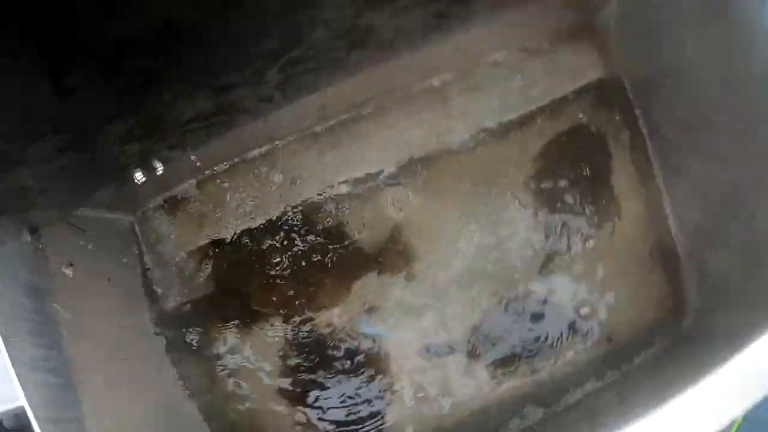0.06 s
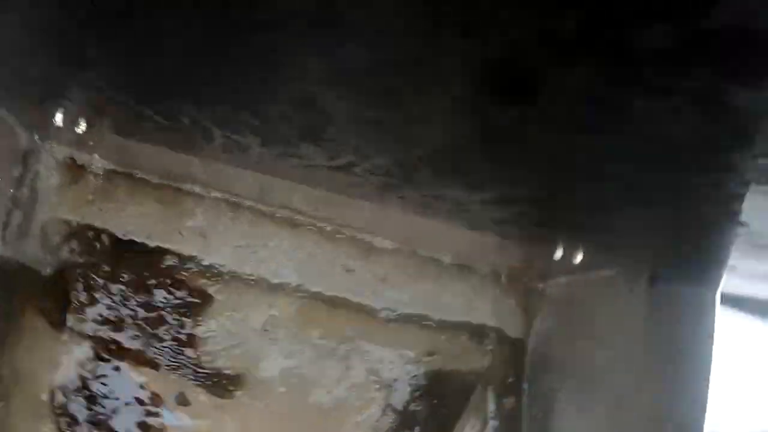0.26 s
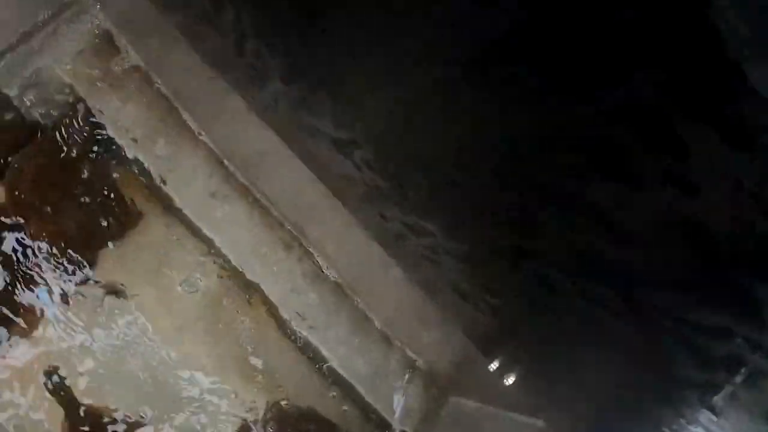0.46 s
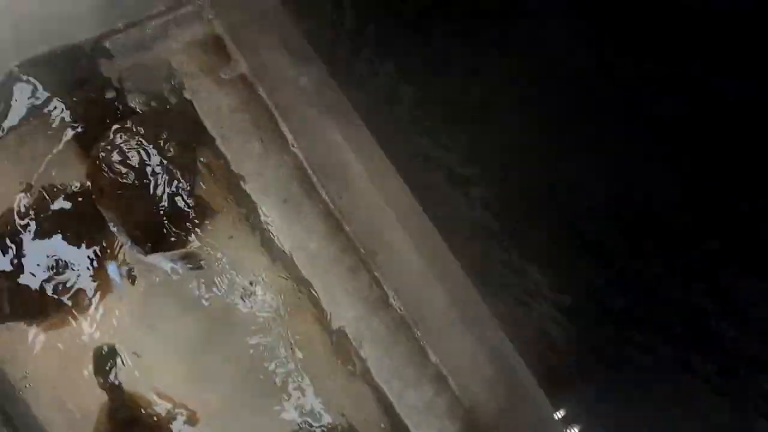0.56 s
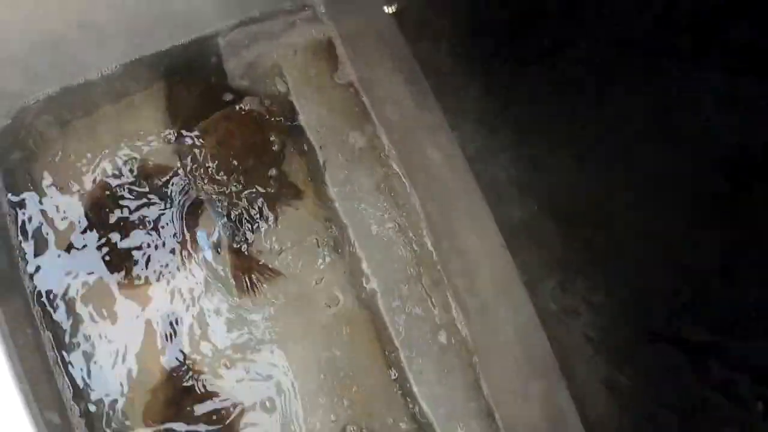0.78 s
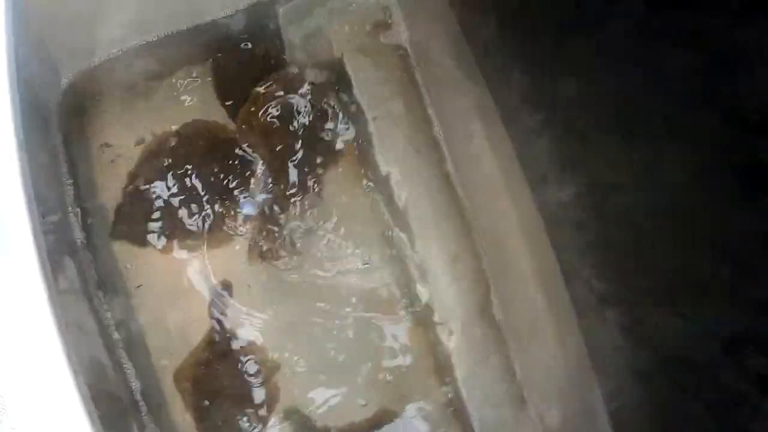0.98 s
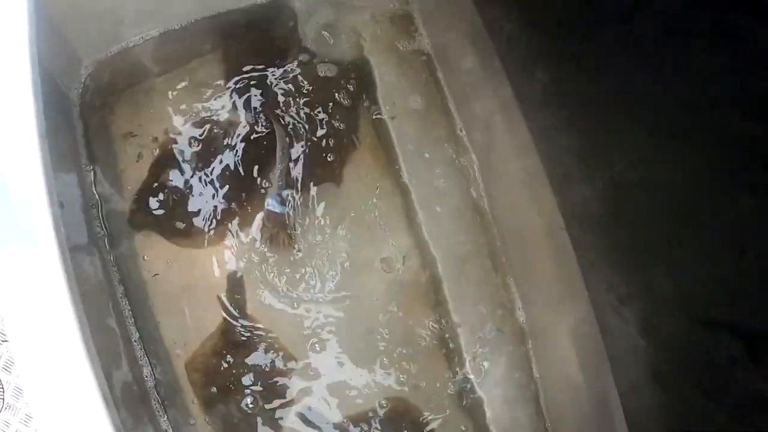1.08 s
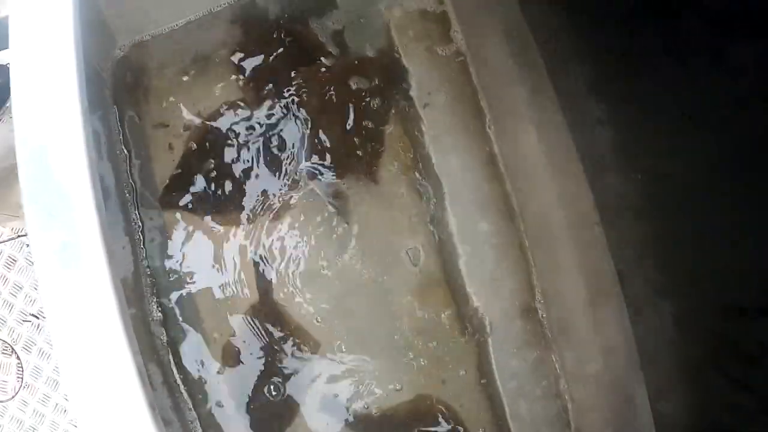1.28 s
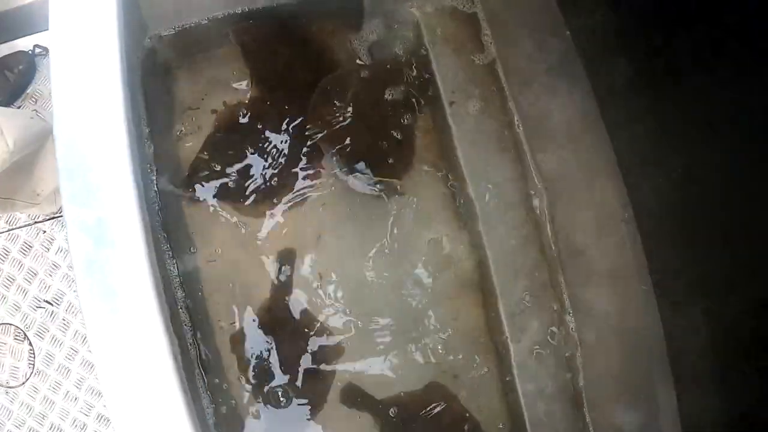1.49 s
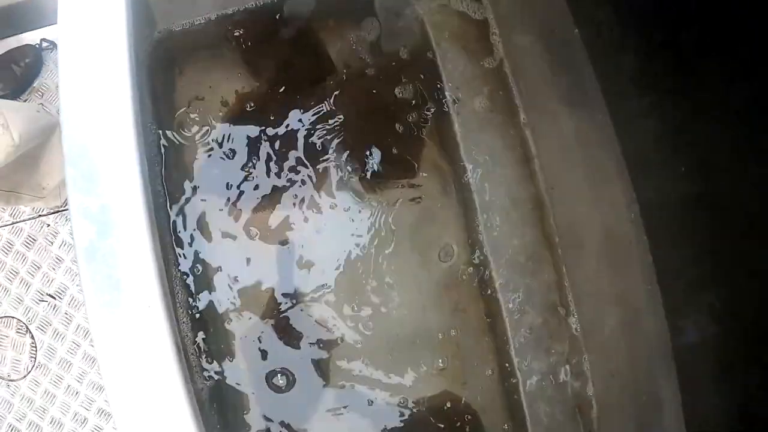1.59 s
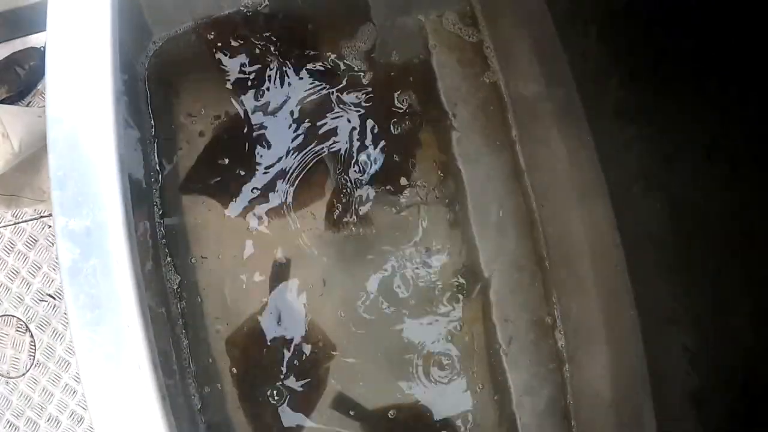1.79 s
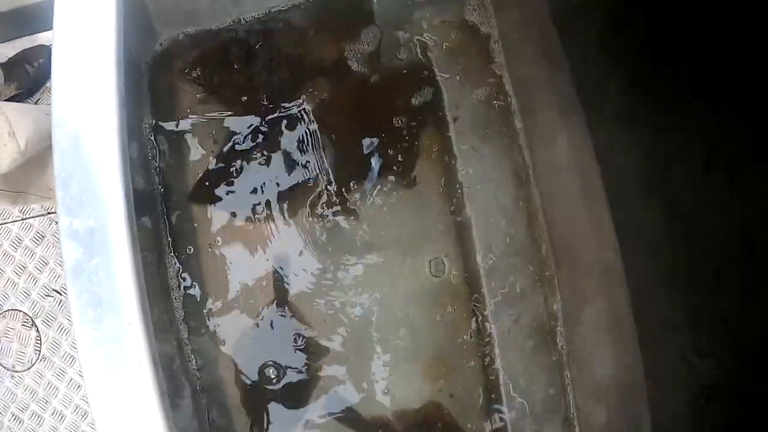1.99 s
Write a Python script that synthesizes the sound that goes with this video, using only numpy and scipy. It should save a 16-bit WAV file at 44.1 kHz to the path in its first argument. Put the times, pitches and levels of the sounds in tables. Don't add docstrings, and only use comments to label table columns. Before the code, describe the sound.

A flatfish thrashes in a shallow water tank, three booming splashes, then drips and bubbles

```python
import sys
import numpy as np
from scipy import signal
from scipy.fft import rfft, irfft
from scipy.io import wavfile
from scipy.ndimage import uniform_filter1d

SR = 44100
rng = np.random.default_rng(int(sys.argv[2]) if len(sys.argv) > 2 else 0)


def invert_db(x):
    u = np.asarray(x, float) / 20
    return 10 ** u


def wav_out(sig):
    wavfile.write(sys.argv[1], SR, np.round(np.clip(np.atleast_2d(sig).T, -1, 1) * 32767).astype(np.int16))


N = 90404


def rms_one(x):
    return x / np.sqrt(np.mean(x ** 2) + 1e-20)


def in_time(rows):
    return np.interp(np.arange(N) / SR, *np.transpose(rows))


def at_hz(points, hz):
    points_hz, points_db = np.transpose(points)
    return np.interp(np.log(hz), np.log(points_hz), points_db)


def colour(x, points):
    hz = np.fft.rfftfreq(N, 1 / SR) + 1
    return rms_one(irfft(rfft(x) * invert_db(at_hz(points, hz)), N))


def flicker(size):
    return rms_one(uniform_filter1d(uniform_filter1d(rng.standard_normal(N), size), size))


def patchy(x, patch_db):
    edges = 150 * 2 ** np.arange(0, 7.1, .5)
    total = np.zeros(N)
    for band in zip(edges, edges[1:]):
        part = signal.sosfilt(signal.butter(2, band, "band", fs=SR, output="sos"), x)
        total += part * invert_db(patch_db * flicker(size=350))
    return rms_one(total)


def ring(clicks, hz, t60):
    r, w = invert_db(-60 / (t60 * SR)), 2 * np.pi * hz / SR
    return signal.lfilter([0, np.sin(w)], [1, -2 * r * np.cos(w), r * r], clicks + 1e-18)


# start_s, peak_db, contact_run_s, spray_db, spray_t60_s
BLOWS = [
    (.202, -11.5, 0.0622, -25, 0.49),
    (.310, -3.5, 0.0042, -21.5, 0.026),
    (.627, -10.5, 0.0227, -21, 0.12),
]
# pitch_hz, t60_s, first_blow_db, second_blow_db, third_blow_db
WALL_MODES = [(49, 0.61, -53, -45, -18.5), (76.94, 0.88, -19, -38, -11), (125.15, 0.85, -15.5, -31.5, -14),
              (149.8, 0.68, -8, -30, -12), (244.6, 0.046, 8.5, -1, -7), (352, 0.059, 0.5, -33, -29),
              (597.6, 0.15, -11, -11.5, -10.5), (719, 0.19, -23, -38, -2.5), (900, 0.092, -14, -16, -12),
              (539, 0.11, -14, -16.5, -15)]
# pitch_hz, level_db (per Hz)
SPRAY = [(180, -22), (300, 3), (606, -4.5), (1250, -17), (2780, -27.5), (12500, -58.5), (15000, -93)]


def blows():
    contacts_per_s, contact_cut_hz = 300, 22000
    growth_share = .2
    tail_db, tail_t60_s = -14, 0.58
    out, t = np.zeros(N), np.arange(N) / SR
    spray = patchy(colour(rng.standard_normal(N), SPRAY), 2.0) * invert_db(0.5 * flicker(size=50))
    soft = np.exp(-2 * np.pi * contact_cut_hz / SR)
    for k, (start, db, length, spray_db, spray_t60) in enumerate(BLOWS):
        draw = rng.uniform(-1, 1, (40, 16))
        when = np.cumsum(1 + 0.54 * draw[:, 0]) / contacts_per_s
        when = when - when[0]
        keep = when <= length
        when = when[keep]
        at = ((start + when) * SR).astype(int)
        growth = np.sign(draw[keep, 1]) * np.minimum(1, 0.36 + when / (growth_share * length))
        for m, (hz, t60, *mode_db) in enumerate(WALL_MODES):
            clicks = np.zeros(N)
            clicks[at] = (1 + 0.27 * draw[keep, m + 2]) * growth
            clicks *= invert_db(db + mode_db[k]) / np.sqrt(keep.sum())
            out += ring(signal.lfilter([1 - soft], [1, -soft], clicks), hz, t60)
        u = t - start
        burst = invert_db(-60 * np.clip(u - length, 0, 1) / spray_t60)
        draining = invert_db(tail_db - 60 * np.abs(u) / tail_t60_s)
        onset = np.clip(u / (0.17 * length), 0, 1)
        out += spray * invert_db(spray_db) * (burst + draining) * onset
    return out


# start_s, peak_db, first_pitch_hz, last_pitch_hz, length_s
POCKETS = [(.001, -41, 143, 139, 0.023), (0.216, -12.5, 259.5, 236, 0.03), (.311, -6, 169.3, 134, 0.057),
           (0.387, -17.5, 149.8, 146.4, 0.074), (.642, -12, 151, 141, .048), (0.534, -24, 152, 152, 0.033),
           (0.71, -21.5, 143, 143, 0.031), (0.774, -37.5, 274, 261.4, 0.089), (.93, -36, 126, 130.7, 0.27),
           (1.24, -42, 133, 128.5, 0.073)]


def pockets():
    out, t = np.zeros(N), np.arange(N) / SR
    for start, db, first_hz, last_hz, length in POCKETS:
        u = np.clip((t - start) / length, 0, 2)
        hz = (first_hz + (last_hz - first_hz) * u) * (u > 0)
        phase = 2 * np.pi * np.cumsum(hz) / SR
        out += invert_db(db - 6 * u - 14 * u ** 6) * np.minimum(1, u / .08) * np.sin(phase)
    return out


# time_s, level_db
SLOSH = [(.18, -48.5), (.23, -24), (.55, -27), (.582, -31.5), (.6, -24), (.66, -19), (.8, -35.5),
         (1.1, -42), (1.3, -54.5), (1.45, -58), (2.05, -70)]


def slosh():
    hum = np.zeros(N)
    for hz, *_ in WALL_MODES:
        octaves = np.log2(hz / 150)
        mode_db = 5.0 * octaves if hz < 150 else -19 * octaves
        hum += invert_db(mode_db) * rms_one(ring(rng.standard_normal(N), hz, 0.14))
    return invert_db(-1.5 + in_time(SLOSH)) * rms_one(hum)


def droplet_bursts(rows, t60, attack_s):
    out, u = np.zeros(N + SR), np.arange(SR // 8) / SR
    for start, db, hz, width in rows:
        grains = rng.standard_normal(len(u))
        grains = grains * np.abs(grains)
        edges = np.clip(hz * 2 ** (np.array([-.5, .5]) * width), 50, .45 * SR)
        burst = signal.sosfilt(signal.butter(2, edges, "band", fs=SR, output="sos"), grains)
        i = int(start * SR)
        out[i:i + len(u)] += invert_db(db - 60 * u / t60) * rms_one(burst) * np.minimum(1, u / attack_s)
    return out[:N]


# start_s, level_db, centre_hz, width_octaves
CRACKS = [(.217, -29, 3260, 0.79), (.309, -22, 1700, 2.04), (.345, -53, 4100, 0.49),
          (.358, -45.5, 5500, 0.47), (.393, -38.5, 4550, 0.29), (.442, -33.5, 1740, 0.79),
          (.620, -22, 1470, 1.2), (.627, -24, 2600, 1.1), (.648, -51, 4200, 0.9), (1.205, -37.5, 3000, 1.1),
          (1.539, -46, 1960, 0.35), (1.571, -45.5, 2460, 2.6), (1.788, -39.5, 2200, 1.6),
          (2.005, -38, 3000, 1.86)]


def cracks():
    return droplet_bursts(CRACKS, t60=0.022, attack_s=0.0017)


# start_s, level_db, centre_hz, width_octaves
SPLATS = [(0.304, -43, 4950, 0.95), (.379, -32, 610, 2), (.41, -50.5, 7750, 0.85), (0.521, -41, 1470, 0.83),
          (0.587, -42, 7670, 0.39), (0.69, -33, 2600, 0.79), (0.722, -41.5, 3670, 0.54),
          (.764, -30, 2100, 0.56), (.80, -38.5, 1390, 0.88), (.785, -43, 3130, 0.6), (.511, -52, 900, 1.1),
          (.545, -42.5, 1290, 0.89), (.645, -34.5, 2300, 1.15), (.27, -33, 800, 2.2),
          (1.86, -38, 1740, 1.45), (1.95, -45, 1690, 1.2), (.863, -47, 2380, 1.1), (0.973, -45.5, 2940, 1),
          (1.152, -41, 378, 1.27), (1.161, -52, 9400, 0.6), (1.227, -45.5, 2430, 1.7),
          (1.441, -47.5, 9500, 0.22), (1.57, -58.5, 9500, 0.34), (1.83, -34.5, 1560, 1.3),
          (1.888, -42, 8950, 0.37), (1.929, -32, 8660, 0.28), (2.007, -39.5, 3440, 0.81),
          (2.03, -46, 5970, 1.3)]


def splats():
    return droplet_bursts(SPLATS, t60=0.066, attack_s=0.0047)


def bubbles(rows, follower_db, wobble):
    follower_s, follower_spread = .025, 0.137
    out, u = np.zeros(N + SR), np.arange(SR // 6) / SR
    draw = rng.uniform(-1, 1, (len(rows), 5, 3))
    waver = flicker(size=120)
    for (start, db, hz, t60, rise), chance in zip(rows, draw):
        for k, (late, off, size) in enumerate(chance):
            follows = k > 0
            i = int((start + follows * follower_s * abs(late)) * SR)
            f = hz * (1 + follows * follower_spread * off)
            drift = np.take(waver, i + np.arange(len(u)), mode="wrap")
            bend = 1 + rise * np.minimum(u, .05) + wobble * drift
            life = max(t60, .005) * (.5 if follows else 1)
            decay = invert_db(-20 * u / life - 86 * (u / life) ** 2)
            body = np.sin(2 * np.pi * np.cumsum(f * bend) / SR) * decay
            level = invert_db(db - 0.5 + follows * (follower_db + 2.7 * size))
            out[i:i + len(u)] += level * body * np.minimum(1, u * hz / 1.1)
    return out[:N]


# start_s, peak_db, pitch_hz, t60_s, relative_rise_per_s
LONE = [(.030, -49, 1204, 0.06, 1), (.047, -45.5, 4040, 0.036, 4), (.113, -37, 1470, 0.022, 1),
        (.186, -46.5, 3940, 0.07, 6), (.170, -51, 1760, 0.14, 0.5), (.228, -26, 2830, .03, 12),
        (.266, -46, 3740, 0.018, 7), (.629, -10.5, 610, 0.061, -0.2), (.725, -44, 2750, 0.18, 1.5),
        (.765, -45, 3940, 0.065, 1), (1.070, -51, 1970, .06, -1), (1.540, -58, 2050, 0.093, 5),
        (1.350, -27.5, 822, .135, 2), (1.350, -36.5, 1020, 0.034, 1), (1.381, -30, 900, 0.044, 15),
        (1.401, -44, 872, 0.12, -2.5), (1.430, -53, 842, .22, 0.5), (1.476, -44, 826, 0.023, 6),
        (1.225, -50, 5000, 0.074, -0.5), (1.825, -43, 1436, 0.05, -3), (2.020, -28, 958, 0.062, 2.5)]


def lone_bubbles():
    return bubbles(LONE, follower_db=-35, wobble=0.016)


# start_s, peak_db, pitch_hz, t60_s, relative_rise_per_s
BIG = [(.114, -26.5, 758, 0.028, 11), (.127, -29, 893, 0.063, 1.5), (.144, -40, 867, 0.24, 0.26),
       (1.229, -44.5, 1020, 0.016, 0.68), (1.298, -42.5, 1210, 0.026, 0.57),
       (1.319, -48.5, 1236, 0.11, 0.88), (1.571, -38.5, 1210, 0.0085, 1), (1.743, -48, 1006, 0.046, 1.9),
       (1.788, -28.5, 962, 0.083, 9.7), (1.807, -40, 1010, 0.026, 4), (1.873, -37.5, 1068, 0.065, 10.6),
       (1.905, -35, 1211, 0.15, 3.92), (1.934, -28, 870, 0.04, 0.74), (1.964, -37, 764, 0.099, 1.8),
       (1.997, -25.5, 714.6, 0.1, 1.4), (2.008, -21.5, 765, 0.037, 1), (2.031, -34, 715, 0.057, 1.7)]
# start_s, peak_db, pitch_hz
MID = [(0.04, -36, 2610), (0.099, -46, 3200), (.165, -40.5, 1510), (.218, -26, 2820), (0.374, -34.5, 2360),
       (0.696, -36.5, 2810), (0.764, -31.5, 1950), (0.864, -41, 1843), (0.94, -40.5, 2320),
       (1.048, -48.5, 2910), (1.088, -41.5, 2367), (1.157, -28, 2983), (1.175, -48, 2550),
       (1.541, -42.5, 1720), (1.617, -48.5, 2290), (1.828, -35.5, 2086), (1.838, -29.5, 2145),
       (1.856, -40, 3760), (1.881, -33, 2160), (1.892, -36, 3140), (2.005, -31.5, 1987), (2.013, -24, 1594),
       (2.012, -31.5, 2800), (2.032, -27.5, 2845), (2.037, -31, 3570)]
# start_s, peak_db, pitch_hz
SMALL = [(0.074, -50, 6700), (0.148, -42.5, 5710), (0.27, -39, 5800), (0.543, -52, 5800),
         (1.215, -52.5, 5530), (1.446, -39.5, 4410), (1.474, -47, 6450), (1.527, -57, 8520),
         (1.835, -46, 6200), (1.902, -39.5, 5270), (1.935, -37.5, 4520)]


def clustered_bubbles():
    mid_t60_s, mid_rise = 0.038, 0.61
    small_t60_s, small_rise = 0.048, 0.15
    rows = list(BIG)
    rows += [(*row, mid_t60_s, mid_rise) for row in MID]
    rows += [(*row, small_t60_s, small_rise) for row in SMALL]
    return bubbles(rows, follower_db=-6, wobble=0.037)


# time_s, level_db
STIR = [(.19, -53.5), (.24, -60.5), (.4, -54), (.56, -56), (.72, -55), (.9, -63), (1.76, -61.5), (1.8, -59),
        (1.9, -52), (1.98, -54.5), (2.05, -47.5)]
# pitch_hz, level_db (per Hz)
WATER = [(240, -3), (400, 1.5), (949, -8), (2290, -12.5), (2700, -6.5), (10600, -21.5), (15000, -74)]


def stirring():
    fizz_per_s, fizz_cycles = 650, 9.6
    sizes = invert_db(1.3 * np.minimum(rng.exponential(1, N), 3)) * (rng.random(N) < fizz_per_s / SR)
    dealt = rng.integers(0, 30, N)
    fizz = np.zeros(N)
    for k, hz in enumerate(np.geomspace(1000, 12000, 30)):
        plinks = ring(sizes * (dealt == k), hz, fizz_cycles / hz)
        fizz += invert_db(at_hz(WATER, hz)) * np.sqrt(hz) * plinks
    wash = patchy(colour(rng.standard_normal(N), [(200, -50)] + list(WATER)), 2.6)
    return invert_db(in_time(STIR)) * (invert_db(-2) * rms_one(fizz) + invert_db(-4.5) * wash)


def box(x):
    t60_s, cut_hz = 0.095, 3500
    u = np.arange(SR // 2) / SR
    echoes = rng.standard_normal(len(u)) * (rng.random(len(u)) < .04)
    echoes *= invert_db(-60 * u / t60_s) * (u > .002)
    echoes = signal.sosfilt(signal.butter(1, cut_hz, fs=SR, output="sos"), echoes)
    return signal.fftconvolve(x, echoes / np.sqrt(np.sum(echoes ** 2)))[:N]


# pitch_hz, level_db (per Hz)
AIR = [(18, -48), (30, -32), (219, 4), (622, -2.5), (747, -9.5), (1970, -4), (9680, -23.5), (13600, -33),
       (15500, -40)]


def open_air():
    return invert_db(-58) * colour(rng.standard_normal(N), AIR)


def scene():
    walls = blows() + pockets() + slosh()
    water = cracks() + splats() + clustered_bubbles() + stirring()
    mix = walls + water + invert_db(-8) * box(water) + lone_bubbles() + open_air()
    return mix[None]


def roll_off(x):
    return signal.sosfilt(signal.butter(12, 15710, fs=SR, output="sos"), x)


def record(dry):
    rounded = 0.94 * np.tanh(dry / 0.92)
    mix = signal.sosfilt(signal.cheby2(10, 60, 15700, fs=SR, output="sos"), rounded)
    return roll_off(mix)


dry = scene()
out = record(dry)
wav_out(out)
```